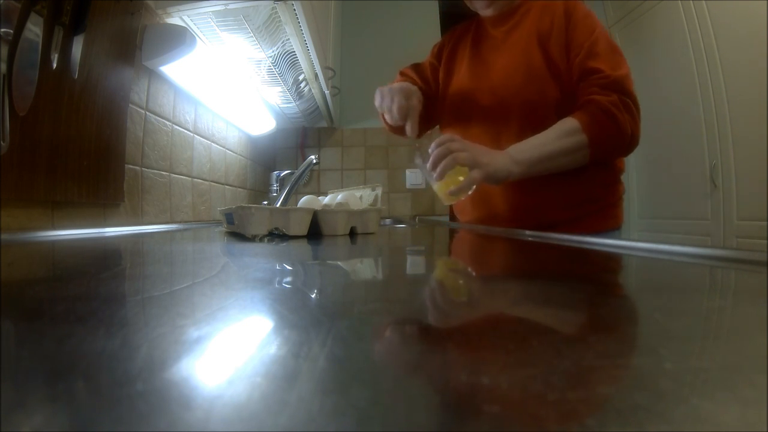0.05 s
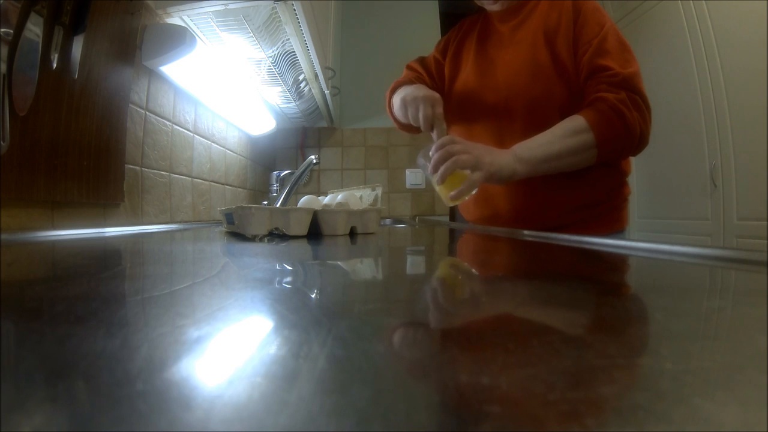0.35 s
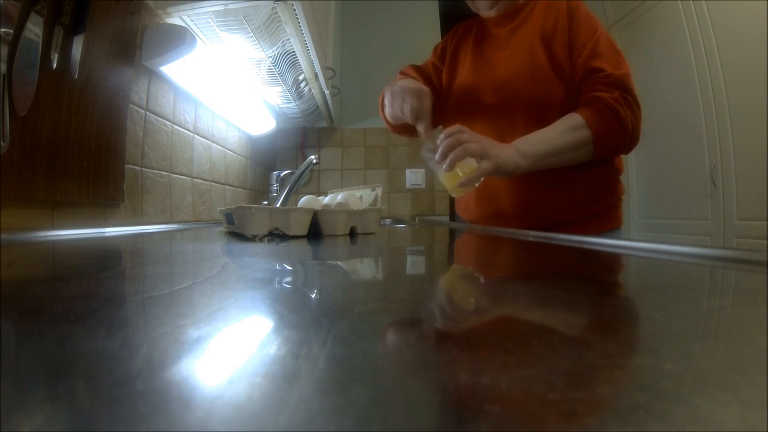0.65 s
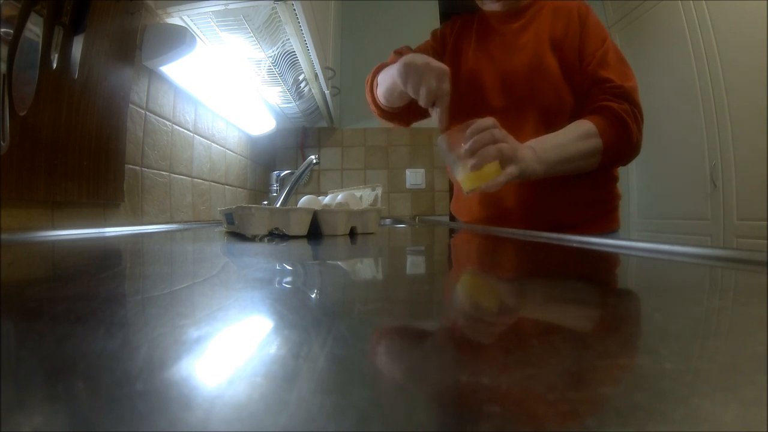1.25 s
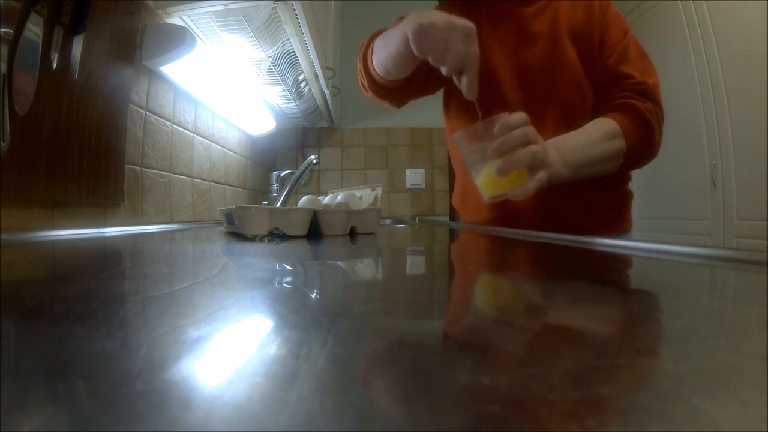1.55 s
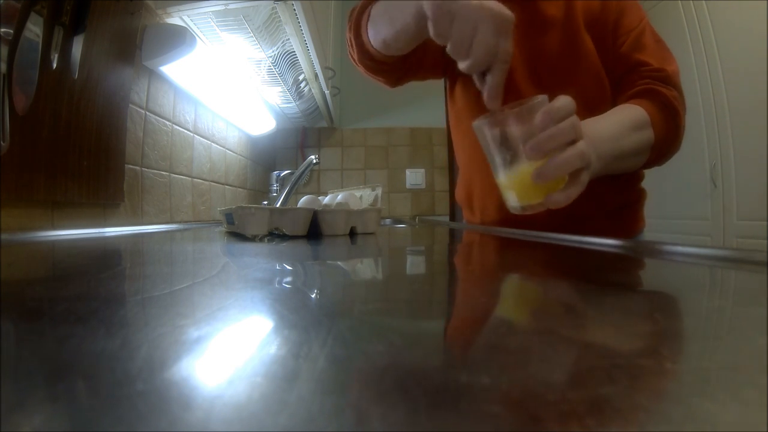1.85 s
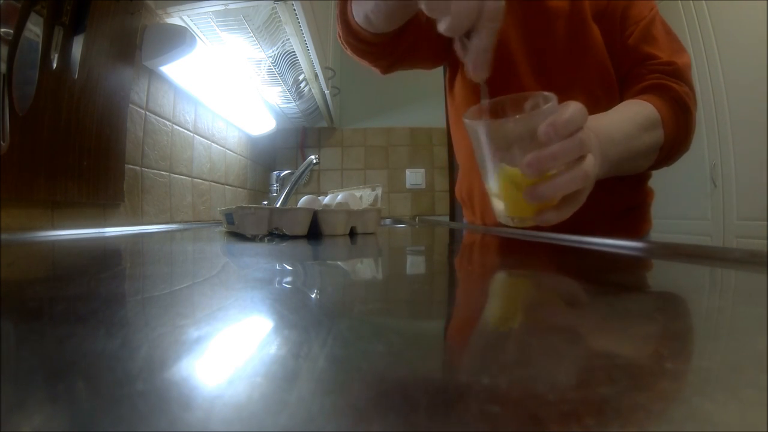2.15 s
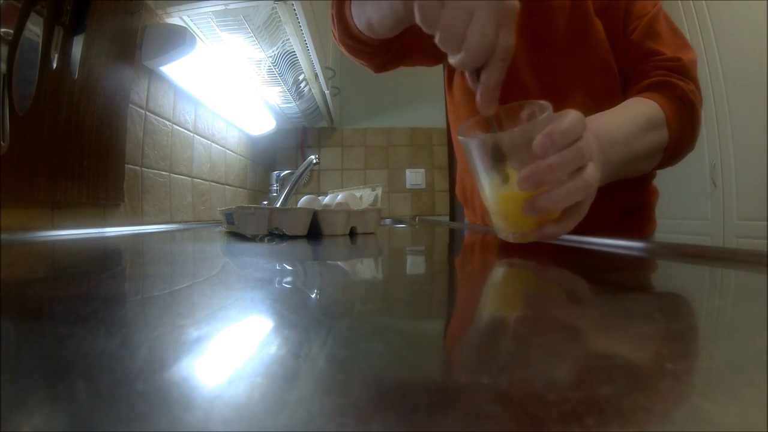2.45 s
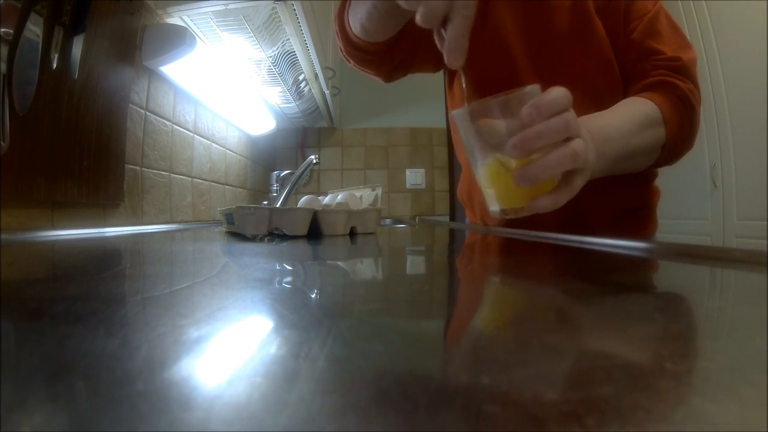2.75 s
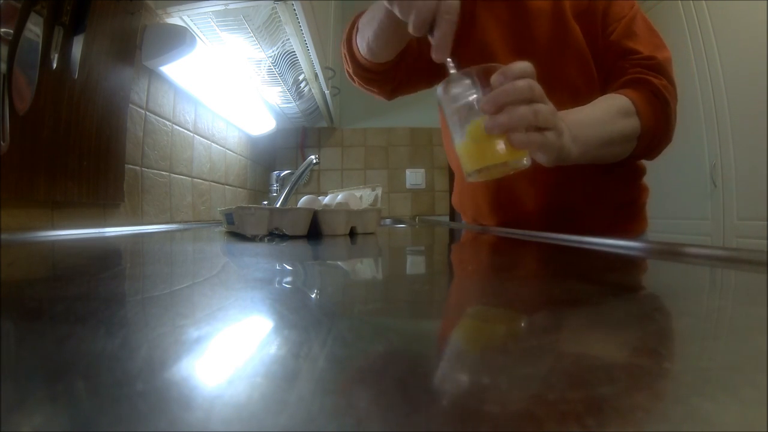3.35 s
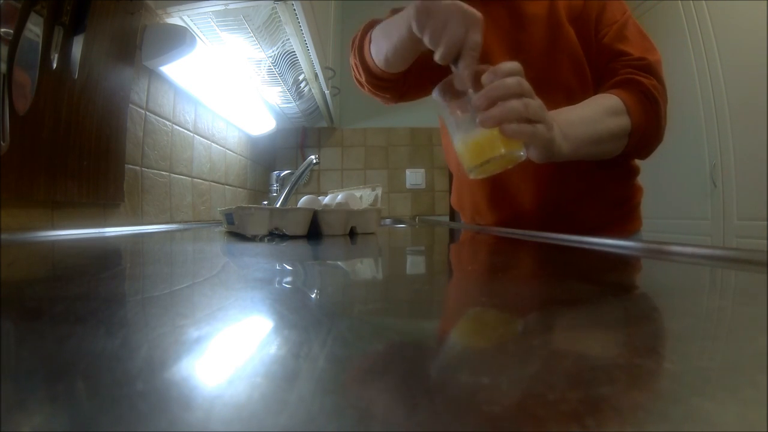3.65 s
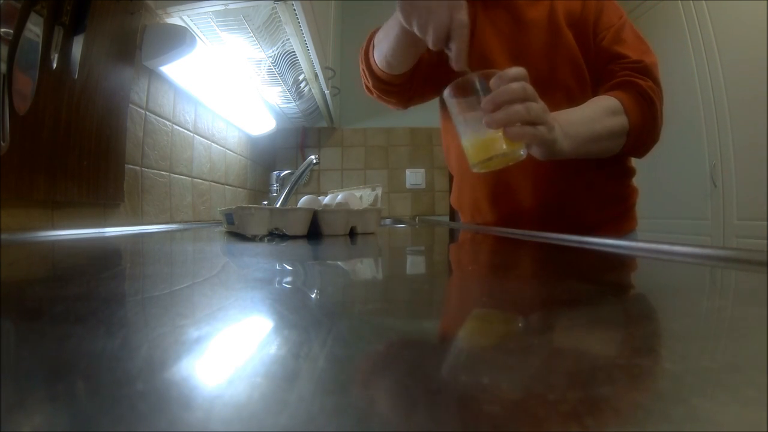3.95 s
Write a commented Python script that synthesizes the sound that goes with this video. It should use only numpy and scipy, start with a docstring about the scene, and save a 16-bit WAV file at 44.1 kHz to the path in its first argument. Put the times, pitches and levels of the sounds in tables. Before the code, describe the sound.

In a small tiled kitchen, an egg is whisked in a hand-held glass: rapid, damped fork taps with wet sloshing and bubbling. The beating grows nearer and drier halfway, then backs off slightly, over a faint electrical hum.

```python
"""A fork beats an egg in a hand-held drinking glass, in a small tiled kitchen.
About five strokes a second scrape and knock on the glass, whose ring the hand and the liquid
quickly damp. The egg splashes, and its bubbles plop, spatter and fizz.
Half-way the glass comes closer and sounds drier, then moves partly back.
A low mains hum and a soft hiss run underneath."""
import sys
import numpy as np
from scipy import signal
from scipy.io import wavfile

SR = 44100
rng = np.random.default_rng(int(sys.argv[2]) if len(sys.argv) > 2 else 0)


def generate_wav(sig):
    """Save sig (samples, or channels by samples) to the path in sys.argv[1] as 16-bit PCM at SR."""
    pcm = np.round(np.clip(np.atleast_2d(sig).T, -1, 1) * 32767).astype(np.int16)
    wavfile.write(sys.argv[1], SR, pcm)


N = 176400   # 4 seconds


def from_db(db):
    """Turn decibels into a number to multiply a sound by."""
    return 10 ** (np.asarray(db) / 20)


def unit_level(x):
    """Scale a sound so that its average level (rms) is 1."""
    return x / np.sqrt(np.mean(x ** 2) + 1e-20)


def at_hz(table, hz, column=1):
    """Read a table at any pitch, gliding between its rows."""
    table = np.array(table)
    return np.interp(np.log(hz), np.log(table[:, 0]), table[:, column])


def add(out, start, sound):
    """Mix a sound in at a start time in seconds."""
    i = max(0, int(start * SR))
    out[i:i + len(sound)] += sound[:max(0, len(out) - i)]


def noise_bands(size):
    """Give 30 bands of noise from low to high, each as (middle pitch, samples)."""
    edges = np.geomspace(18, 17500, 31)
    for low, high in zip(edges, edges[1:]):
        band_filter = signal.butter(2, [low, high], "band", fs=SR, output="sos")
        noise = rng.standard_normal(size + SR // 10)
        yield np.sqrt(low * high), signal.sosfilt(band_filter, noise)[-size:]


def grainy_noise(hz, width_hz, size):
    """Crackly noise gathered around one pitch."""
    decay = np.exp(-np.pi * width_hz / SR)
    feedback = [1, -2 * decay * np.cos(2 * np.pi * hz / SR), decay * decay]
    grains = rng.standard_normal(size) * rng.exponential(1, size) ** 2
    return unit_level(signal.lfilter([1, 0, -1], feedback, grains))


# Where the hand holds the glass: (time [s], nearness [0 far, 1 near])
GLASS_PATH = [(0, 0.05), (1.0, .05), (1.5, 0.7), (2.0, 0.94), (2.6, 0.96), (3.1, 0.46), (3.5, 0.4),
              (4, 0.51)]

def nearness(time):
    """How near the glass is at a given time."""
    return np.interp(time, *np.transpose(GLASS_PATH))


# The tones of the mains hum: (pitch [Hz], level [dB])
HUM_TONES = [(48.4, -48), (99.9, -59.5), (148, -70), (195, -73)]
# The hiss from low to high: (pitch [Hz], relative level [dB])
HISS_COLOUR = [(20, -52.5), (35, -60.5), (70, -62.5), (150, -72), (400, -73), (1000, -74), (4000, -79),
               (15000, -90)]

def hum_and_hiss(hiss_db=-52.5):
    """An appliance hums steadily over a soft hiss."""
    t = np.arange(N) / SR
    hum = sum(np.sqrt(2) * from_db(db) * np.sin(2 * np.pi * (hz * t + rng.random()))
              for hz, db in HUM_TONES)
    hiss = sum(from_db(at_hz(HISS_COLOUR, hz)) * band for hz, band in noise_bands(N))
    return hum + from_db(hiss_db) * unit_level(hiss)


def stirring(lag_s):
    """How much the egg moves: it swells and settles after every stroke, and averages 1."""
    motion, t = np.zeros(N), np.arange(SR // 4) / SR
    for start, db, *_ in list(GLASS_AND_EGG_TAPS) + list(FORK_SCRAPES):
        add(motion, start, from_db(db) * t * np.exp(-t / lag_s))
    return motion / motion.mean()


# How loud the small bubbles are at each pitch: (pitch [Hz], relative level [dB])
SPATTER_COLOUR = [(500, -7.5), (800, -26.5), (1150, 13.5), (1700, 7), (3000, -4), (6000, 1), (13000, -35)]

def spatter(level_db=-50.5, bubbles_per_s=420, ring_cycles=46, pitches=30):
    """Small bubbles burst at random, most often just after a stroke."""
    bursts = rng.random(N) < bubbles_per_s * (0.06 + stirring(lag_s=0.03)) / SR
    kicks = bursts * from_db(np.minimum(rng.exponential(1, N), 4)) * rng.choice([-1, 1], N)
    pitch_choice, out = rng.integers(0, pitches, N), 0
    for k, hz in enumerate(np.geomspace(520, 12500, pitches)):
        # This filter turns each kick into a short, fading tone.
        decay, angle = from_db(-60 * hz / (ring_cycles * SR)), 2 * np.pi * hz / SR
        feedback = [1, -2 * decay * np.cos(angle), decay * decay]
        bubbles = signal.lfilter([0, np.sin(angle)], feedback, kicks * (pitch_choice == k) + 1e-18)
        out = out + from_db(at_hz(SPATTER_COLOUR, hz)) * bubbles
    return from_db(level_db) * unit_level(out)


# The tones of the glass, scraped or tapped. A fade time is how long a sound takes to fall by 60 dB.
# (pitch [Hz], level [dB], fade time [s], level change when held near and upright [dB])
GLASS_TONES = [(1077, -17, 0.021, 2.5), (1204, -12.5, 0.041, -11.5), (1300, -20, 0.031, 3),
               (2243.5, -11, 0.051, -1), (2398.5, -7.5, 0.026, 2.5), (2744, -13, 0.033, -1),
               (3256, -3.5, 0.023, -19.5), (3830, -10, 0.012, -7.5), (4893, -9.5, 0.019, -12),
               (5310, -5, 0.0089, -1), (5579, 0, 0.02, 3), (5995, -7.5, 0.0076, -23),
               (7515, -28.5, 0.018, 4.5), (9190, -13.5, 0.06, -16), (9410, -14, 0.038, -7),
               (9700, -25.5, 0.023, 6), (10880, -26, 0.0079, 14), (13450, -29, 0.022, 13.5),
               (14080, -23, 0.022, 1.5)]
PITCH_SPREAD = 0.0087   # the sloshing egg shifts each tone by about this share
# The fork grazes the wall and slides along it: (time [s], level [dB], length [s])
FORK_SCRAPES = [(.009, -31, 0.0073), (0.18, -17.5, 0.0045), (0.3706, -27.5, 0.0034), (0.5556, -23, 0.0061),
                (0.7525, -20, 0.0032), (0.964, -14.5, 0.0031), (1.1682, -20.5, 0.0025),
                (1.348, -28.5, 0.0055), (2.71, -31.5, 0.0043), (2.959, -24.5, 0.0087)]

def scrapes(slips_per_s=2500, ring_stretch=1.34, hiss_db=-19.5):
    """Tiny slips of the fork ring the glass softly; a graze damps the wall less than a blow."""
    # How strongly rubbing drives the tones: (pitch [Hz], level change [dB])
    rubbing = [(1100, -5.5), (1250, 12), (2400, 4), (3300, -6), (5000, 5),
               (5600, -2), (6000, 6), (9300, 1), (14000, 6)]
    out, t = np.zeros(N), np.arange(SR // 10) / SR
    for start, db, length in FORK_SCRAPES:
        ring, pressure = 0, np.exp(-t / length)
        for hz, tone_db, fade_s, near_db in GLASS_TONES:
            slips = rng.standard_normal(len(t)) * (rng.random(len(t)) < slips_per_s / SR) * pressure
            pitch = hz * (1 + PITCH_SPREAD * rng.normal())
            tone = from_db(-60 * t / (ring_stretch * fade_s)) * np.cos(2 * np.pi * pitch * t)
            rubbed = signal.fftconvolve(slips, tone)[:len(t)]   # every slip starts the tone anew
            gain = from_db(tone_db + near_db * nearness(start) + at_hz(rubbing, hz))
            ring = ring + gain * rubbed / (np.abs(rubbed).max() + 1e-9)
        hiss = from_db(hiss_db) * grainy_noise(hz=9300, width_hz=11000, size=len(t)) * np.sqrt(pressure)
        add(out, start, from_db(db) * (ring + hiss))
    return out


def froth(level_db=-52):
    """Tiny bubbles fizz while the egg moves."""
    return from_db(level_db) * stirring(lag_s=0.017) * grainy_noise(hz=9300, width_hz=11000, size=N)


def colour_db(hz, hollow, clack, treble):
    """Where and how hard a tap lands makes the low, middle and high tones louder or softer."""
    return at_hz([(650, 0), (950, hollow), (1400, hollow), (2000, clack), (4000, clack),
                  (5000, 0), (6200, 0), (8500, treble)], hz)


# The fork hits the glass; the faintest rows are small wet taps and plops of egg:
# (time [s], level [dB], extra hollow low ring [dB], extra clack [dB], extra treble [dB])
GLASS_AND_EGG_TAPS = [(0.047, -20, -0.5, 4, 4), (0.2286, -17, -11, 3, 2.5), (0.4118, -21, 6, 5, 4.5),
                      (0.6072, -21, 5.5, 7, 7.5), (0.8043, -19.5, 3, 3, 4), (0.8376, -30, 0, -2, 3.5),
                      (1.0117, -18.5, 0, 1, 0), (1.0397, -44.5, 20, -2, 1), (1.2046, -15.5, -9, -0.5, 0),
                      (1.2363, -30.5, 6.5, -4, -1), (1.351, -19, -0.5, 4, 3), (1.3935, -17, -3, 2, 0.5),
                      (1.4278, -34.5, 11.5, -5, 9), (1.4612, -35.5, 10, 5.5, -7),
                      (1.5369, -20.5, 5, 6, 5.5), (1.583, -18.5, -8, 3.5, 3), (1.6548, -38.5, 16, -0.5, 4),
                      (1.704, -49.5, 15, 7, 14), (1.7233, -17.5, 7, -0.5, 5.5),
                      (1.769, -19, -2.5, 1.5, 0.5), (1.8438, -41.5, 16, 6.5, 3),
                      (1.8873, -52.5, 26.5, 12, 19), (1.9219, -22, 14, 1, 7), (1.9749, -16.5, 5, -0.5, 2.5),
                      (2.0014, -30, 15.5, 10, 7), (2.0966, -43.5, 26, 2.5, 6),
                      (2.1213, -25.5, 10.5, -0.5, 6.5), (2.1671, -15.5, 6.5, -6, -3.5),
                      (2.1943, -28, 17, 7, 2), (2.2974, -45.5, 23.5, 4, 7), (2.3323, -27.5, 0, -9, 3),
                      (2.3679, -17, 4, -2, 2), (2.3967, -26.5, 20, 7, 2), (2.4558, -42, 11, 3.5, 5),
                      (2.4897, -44.5, 11.5, 5, 13), (2.5365, -27, 9, -7.5, 0.5), (2.5665, -15.5, 3, -3, -3),
                      (2.6313, -32.5, 8.5, 5, -8), (2.6725, -45, -1, 3.5, 14),
                      (2.7092, -17, 5.5, -11, -1.5), (2.754, -15.5, -2, -3.5, -1), (2.776, -36, 5, 6.5, -7),
                      (2.8282, -33.5, 11.5, 1.5, -6), (2.866, -48.5, 18.5, 10, 18.5),
                      (2.9101, -23, 7, 1.5, 10.5), (2.96, -17.5, -1, -1, 1), (2.9832, -28, 12, -5, 7),
                      (3.0439, -45, 9, 5, 7), (3.089, -45, 16.5, 8, 18.5), (3.1268, -17, -4, -1, 6),
                      (3.181, -48.5, 29.5, 19, 23), (3.191, -34, 14.5, 8, -1),
                      (3.306, -40.5, 1.5, 8.5, 16.5), (3.3579, -17.5, -3, 3.5, 7),
                      (3.4011, -40, 31.5, 18.5, 15), (3.5156, -40.5, 8, -3, 8.5), (3.5695, -13, -6, 2, 4),
                      (3.6132, -37, 20, 13, -4), (3.729, -41.5, 24, 1.5, 9), (3.7881, -16.5, 1, 0, 9.5),
                      (3.8242, -34, 18, 11, -9), (3.9361, -44.5, 10.5, 7.5, 15.5),
                      (3.9935, -16.5, 1, 3, 6.5)]

def tap_rings(boost_db=4, spread_db=2, attack_s=0.00025, hold_s=0.002, grip_damping=0.45):
    """Each tap of fork or egg rings the glass, which fades sooner when held near and upright."""
    out, t = np.zeros(N), np.arange(SR // 10) / SR
    hz, tone_db, fade_s, near_db = np.transpose(GLASS_TONES)
    attack = 1 - np.exp(-t / attack_s)
    fall_db = -60 * np.maximum(t - hold_s, 0) / fade_s[:, None]
    for start, db, *colour in GLASS_AND_EGG_TAPS:
        # The moving egg and the point of contact make every tap a little different.
        detune, strength, side = rng.standard_normal((3, len(hz)))
        pitch = hz * (1 + PITCH_SPREAD * detune)
        envelope = attack * from_db(fall_db * (1 + grip_damping * nearness(start)))
        tones = envelope * np.sin(2 * np.pi * pitch[:, None] * t)
        tap_db = boost_db + db + colour_db(hz, *colour) + spread_db * strength
        gains = np.sign(side) * from_db(tap_db + tone_db + near_db * nearness(start))
        add(out, start, gains @ tones)
    return out


# The noise of prongs or egg meeting the wall: (pitch [Hz], relative level [dB])
CHATTER_COLOUR = [(120, -42), (300, -28.5), (700, -16), (1600, -8), (2700, 5), (3800, 1), (4600, -19),
                  (5500, -4.5), (7000, -14), (8200, -26), (10000, -20), (12300, -17), (14000, -18),
                  (16000, -30)]

def chatter(boost_db=0.5, length_s=0.0038):
    """A tiny burst of rough contact opens each tap."""
    out, t = np.zeros(N), np.arange(SR // 50) / SR
    hz, bands = map(np.array, zip(*noise_bands(N)))
    bands = bands * from_db(at_hz(CHATTER_COLOUR, hz))[:, None]
    bands = bands / bands.sum(0).std()
    burst = np.exp(-(t / length_s) ** 2)
    for start, db, *colour in GLASS_AND_EGG_TAPS:
        i = int(start * SR)
        contact = from_db(boost_db + db + colour_db(hz, *colour)) @ bands[:, i:i + len(t)]
        add(out, start, contact * burst[:len(contact)])
    return out


# Flung egg lands: (time [s], level [dB], length [s], pitch [Hz])
EGG_SPLASHES = [(0.076, -36, 0.0073, 4300), (0.26, -39, 0.0091, 4730), (0.48, -36, .02, 3750),
                (0.64, -40, 0.0042, 4900), (0.831, -29, 0.0094, 2370), (1.038, -27.5, .006, 2150),
                (1.053, -49, 0.0054, 4370), (1.241, -31.5, 0.0032, 1950), (1.792, -27.5, 0.0088, 2280),
                (2.218, -31, 0.011, 2050), (2.416, -30.5, 0.011, 2450), (2.776, -36.5, 0.013, 1540),
                (3.806, -32, .01, 2930)]

def splashes():
    """Egg flies off the prongs and falls back with a short, wet burst."""
    out, t = np.zeros(N), np.arange(SR // 14) / SR
    for start, db, length, hz in EGG_SPLASHES:
        wet_noise = grainy_noise(hz, width_hz=0.17 * hz, size=len(t))
        add(out, start, from_db(db) * wet_noise * np.exp(-(t / length) ** 2))
    return out


# Air pockets close in the egg: (time [s], starting pitch [Hz], level [dB], fade time [s])
EGG_PLOPS = [(.085, 610, -37, .05), (.183, 1220, -18, 0.07), (.377, 614, -23.5, 0.028),
             (.425, 685, -34.5, 0.057), (.559, 1237, -26.5, 0.077), (0.599, 1092, -17.5, 0.064),
             (0.611, 1042, -23, 0.075), (0.794, 1300, -29, 0.047), (.83, 920, -30.5, 0.1),
             (0.969, 1143, -12.5, 0.044), (1.198, 900, -21, 0.042), (1.604, 900, -25.5, 0.067),
             (2.173, 1183, -13, 0.028), (2.3, 3480, -25, 0.02), (2.317, 3310, -30, 0.047),
             (2.398, 1274, -22, 0.077), (2.777, 1500, -23, .04), (3.044, 1100, -28.5, 0.058),
             (3.178, 1147, -27, .04), (3.385, 1110, -21, 0.091), (3.403, 1162, -19.5, 0.1),
             (3.532, 882, -34, .05), (3.57, 664, -19, 0.01), (3.727, 1090, -27, .05),
             (3.731, 830, -21, 0.017), (3.915, 3490, -32.5, 0.041)]

def plops(attack_s=0.0012, rise_per_s=1.84):
    """Large bubbles ring briefly and rise in pitch."""
    out, t = np.zeros(N), np.arange(SR // 10) / SR
    swell = 1 - np.exp(-t / attack_s)
    for start, hz, db, fade_s in EGG_PLOPS:
        rising_tone = np.sin(2 * np.pi * hz * (t + rise_per_s * t * t / 2))
        add(out, start, swell * from_db(db - 60 * t / fade_s) * rising_tone)
    return out


# The fork reaches the bottom of the glass: (time [s], relative level [dB])
BASE_THUDS = [(.2291, -35), (.4118, -53), (1.2046, -33.5), (1.351, -47), (1.5374, -32.5), (1.5833, -40),
              (1.7241, -33.5), (1.9223, -42), (1.9744, -43), (2.1674, -41), (2.3678, -32.5), (2.5665, -30),
              (2.7545, -39.5), (3.1266, -35), (3.5698, -45), (3.7886, -39)]

def thuds(boost_db=10, hz=520, width_hz=1070):
    """The thick base gives a dull knock that dies almost at once."""
    out, t = np.zeros(N), np.arange(SR // 50) / SR
    knock = np.exp(1 - np.pi * width_hz * t) * np.sin(2 * np.pi * hz * t)
    for start, db in BASE_THUDS:
        add(out, start, from_db(boost_db + db) * knock)
    return out


# Sound bounces off the worktop and tiles: (delay [s], level [dB])
TILE_ECHOES = [(.0052, -18), (0.0081, -16.5), (0.0145, -27.5)]
# The wash of sound that lingers in the room: (pitch [Hz], level [dB], fade time [s])
ROOM_TAIL = [(200, -26.5, 0.12), (1020, -0.5, 0.17), (2600, -5.5, 0.22), (5100, -5.5, 0.21),
             (8800, -0.5, 0.18), (14900, -14.5, 0.11)]

def kitchen(sound, far_db=-1, near_drop_db=4.5, build_s=0.0017):
    """The room adds a few quick echoes and a short tail, both weaker when the glass is near."""
    t, response = np.arange(SR // 2) / SR, 0
    swell = 1 - np.exp(-(t / build_s) ** 2)
    for hz, band in noise_bands(len(t)):
        tail = swell * from_db(-60 * t / at_hz(ROOM_TAIL, hz, column=2))
        response = response + from_db(at_hz(ROOM_TAIL, hz)) * band * tail / np.linalg.norm(tail)
    for delay, db in TILE_ECHOES:
        add(response, delay, from_db([db]))
    share = from_db(far_db - near_drop_db * nearness(np.arange(N) / SR))
    return signal.fftconvolve(sound * share, response)[:N]


def scene():
    """Mix the glass, the egg, the kitchen's echo and the background into one channel."""
    glass = tap_rings() + chatter() + thuds() + scrapes()
    egg = splashes() + plops() + spatter() + froth()
    beating = glass + egg
    return (beating + kitchen(beating) + hum_and_hiss())[None]


def record(dry, peak_limit=1.1, treble_hz=15000, cutoff_hz=16500):
    """Round off the loudest peaks, soften the highest treble and cut away the very top."""
    rounded = peak_limit * np.tanh(dry / peak_limit)
    dulled = signal.sosfilt(signal.butter(36, treble_hz, fs=SR, output="sos"), rounded)
    return signal.sosfilt(signal.cheby2(16, 60, cutoff_hz, fs=SR, output="sos"), dulled)


dry = scene()
out = record(dry)
generate_wav(out)
```